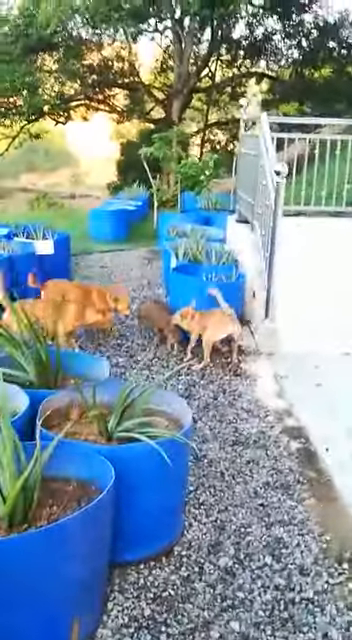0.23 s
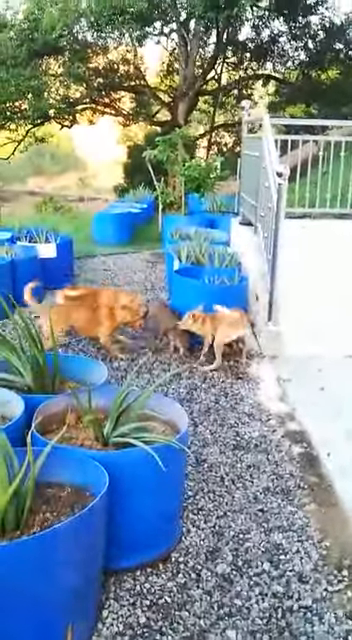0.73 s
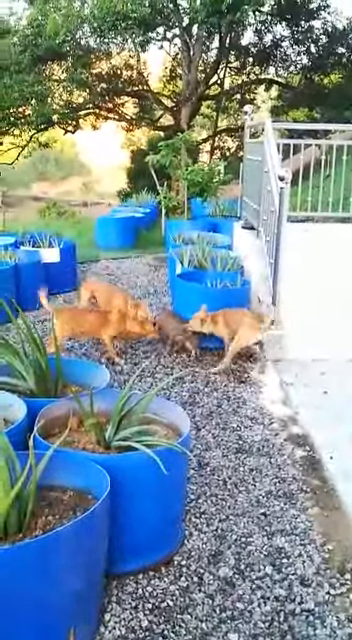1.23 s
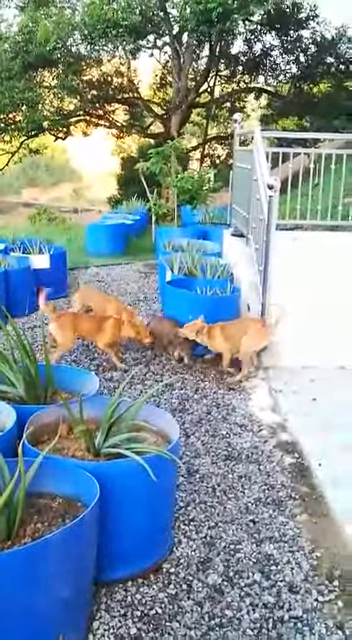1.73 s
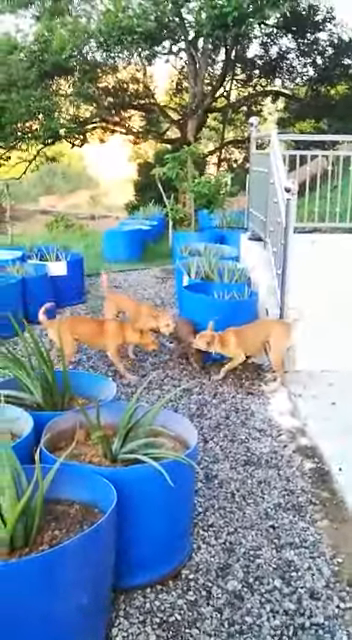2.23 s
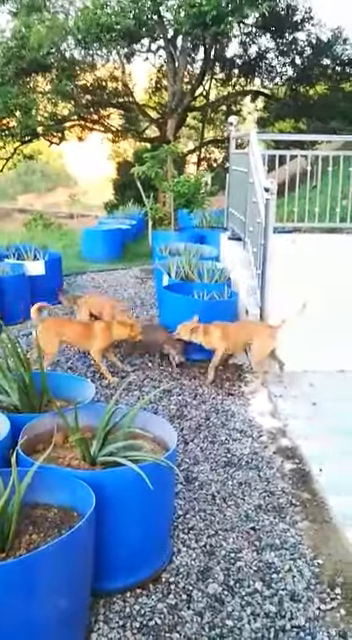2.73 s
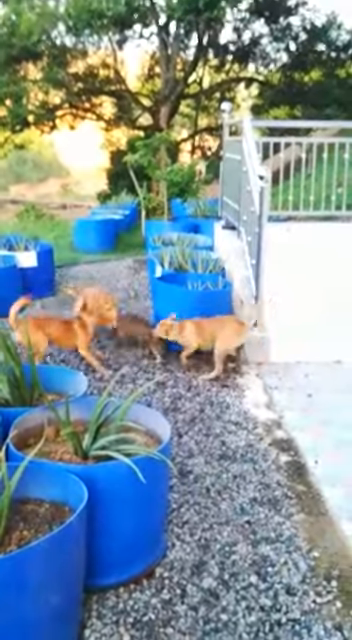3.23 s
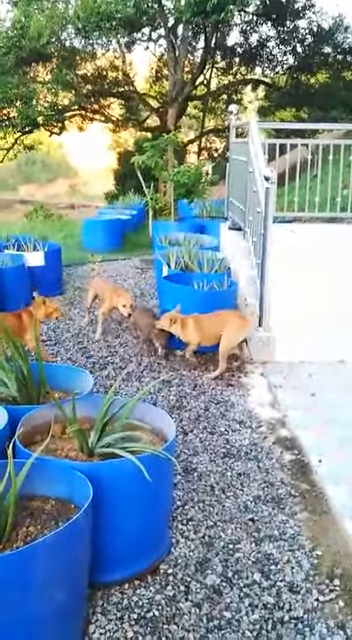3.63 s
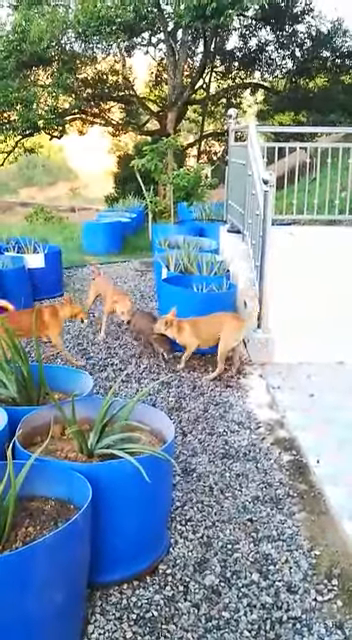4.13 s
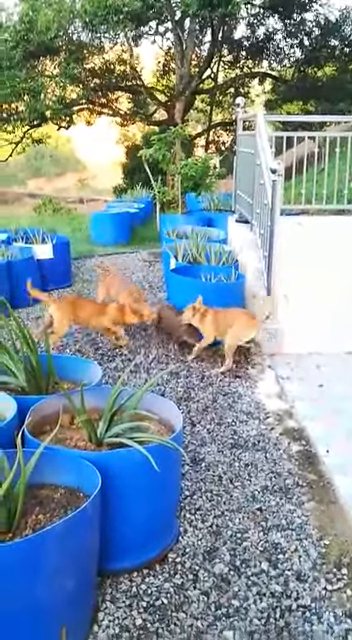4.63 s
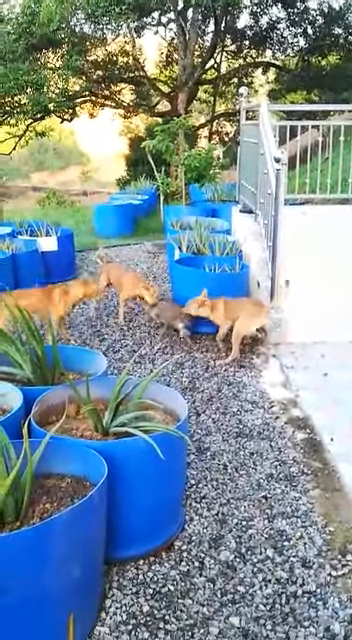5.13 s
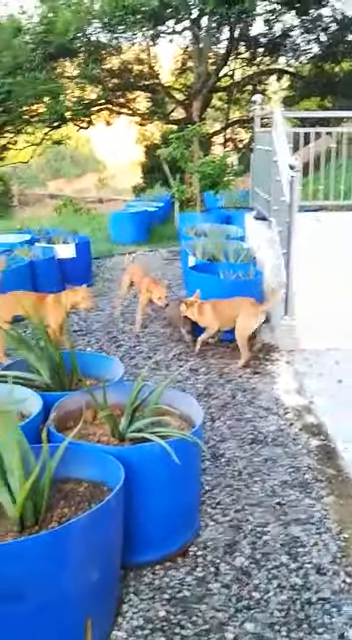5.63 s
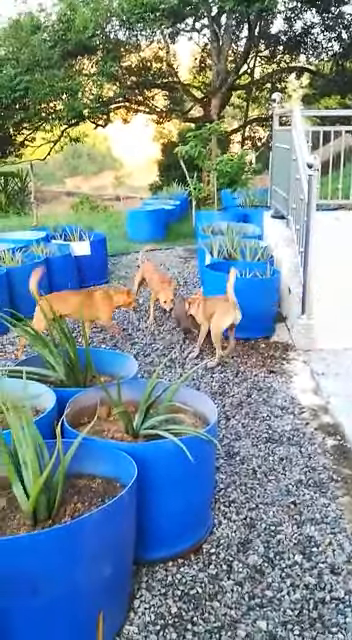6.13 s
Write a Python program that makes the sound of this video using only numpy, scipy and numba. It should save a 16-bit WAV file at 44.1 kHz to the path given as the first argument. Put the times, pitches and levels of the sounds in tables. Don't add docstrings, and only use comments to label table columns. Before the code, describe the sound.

The sound begins inside a young boar's hoarse scream, which pinches shut at 0.27 s with a tiny squeak. In the gap a dog snarls low and rough around 0.45 s while paws scrape gravel. A rising squeak leads into a long, loud, rasping scream from 0.6 to 2.7 s, wavering between torn noise and clearer tone, surging near 1.25 and 1.65 s. A brief gap holds a sudden growl and two hard gravel steps near 2.8 s. The longest scream bursts in tightly at 3.0 and lasts to 5.5 s, crossed by sharp dog yelps at 3.4 and 4.7 s, a low phone thump, and a short growl at 4.8 s. Light steps, a faint tap and a weak indrawn whistle fill the gap before another scream starts at 5.8 s, swells near 6.1 and continues to the end. Gravel crackles throughout, with short outdoor echoes and faint hush.

```python
import sys
import numpy as np
from scipy import signal
from scipy.fft import rfft, irfft, next_fast_len
from scipy.io import wavfile
from scipy.ndimage import uniform_filter1d
from numba import njit

SR = 44100
rng = np.random.default_rng(int(sys.argv[2]) if len(sys.argv) > 2 else 0)


def dump(signal):
    limited = np.clip(np.atleast_2d(signal).T, -1, 1)
    pcm = np.round(limited * 32767).astype(np.int16)
    wavfile.write(sys.argv[1], SR, pcm)


def undo_db(level):
    steps = np.asarray(level, float) / 20
    return 10 ** steps


N = 281799
T = np.arange(N) / SR

# f/Hz, density/dB
YARD_SPECTRUM = [(20, -4), (100, -13.5), (300, -10.5), (700, -7.5), (1100, -4), (2000, -7.5), (3500, -14.5),
                 (6500, -5), (11000, -38), (16000, -8.5)]
YARD_DB = -43.5
# f/Hz, level/dB
SCATTER = [(300, -13), (1000, 3), (2800, -3), (4500, -2), (7000, 20.5), (15000, -14)]
NEAR_T60_S, FAR_T60_S, FAR_DB, POSES = .05, .62, -14, 18
# f/Hz, level/dB
LEFT_OVER_RIGHT = [(200, 0), (750, 1), (1050, -1), (1900, 4), (2500, -1), (5000, -5), (6500, -16.5),
                   (8500, -10), (10000, -9.5), (14500, -6.5)]
LEFT_LAG_S, CUTOFF_HZ = 4.5e-5, 15860

# start t/s, end t/s, level/dB
SCUFFS = [
    (0.394, 0.605, -46),
    (2.776, 2.86, -39.5),
    (2.876, 2.96, -42.5),
    (5.502, 5.55, -44.5),
    (5.649, 5.75, -50.5),
]
GRAVEL_DB, GRAVEL_FOLLOWS, GRAVEL_REST_DB = -35.5, .57, -57.5
# t/s, peak level/dB, push f/Hz, rattle level/dB
KNOCKS = [
    (4.713, -36, 76, -30),
    (5.622, -44, 257, 18),
]

# t/s, f/Hz, level/dB
WHISTLES = [
    [(.245, 2400, -40), (.272, 1500, -29), (.29, 1380, -40)],
    [(.557, 1880, -41), (.58, 2120, -36), (.607, 2200, -29)],
    [(3.36, 540, -40), (3.4, 560, -27), (3.445, 565, -40)],
    [(5.64, 1680, -56), (5.71, 2040, -51), (5.79, 1650, -54)],
]
WHISTLE_OVERTONE_DB = [-13, -8]
# t/s, pitch f/Hz, level/dB
YELPS = [
    [(3.355, 555, -40), (3.387, 600, -26), (3.402, 780, -21), (3.428, 930, -22), (3.46, 1065, -15),
     (3.482, 1075, -23), (3.495, 760, -24), (3.512, 640, -26), (3.55, 605, -39)],
    [(4.655, 420, -30), (4.678, 515, -17), (4.697, 720, -18), (4.716, 930, -11), (4.731, 1015, -9),
     (4.755, 1070, -21), (4.778, 720, -21), (4.8, 620, -23), (4.845, 615, -32)],
]
# f/Hz, level/dB
YELP_THROAT = [(400, -20), (620, 0), (880, -3), (1060, -14), (1400, -8), (2050, 1), (3100, -7), (4200, -32)]
YELP_JAW_DB, YELP_JAW_S = 16, .03
# peak t/s, pitch f/Hz, peak level/dB, swell/s, fade/s
GROWLS = [
    (.45, 187.2, -36.5, 0.066, 0.2),
    (1.172, 190, -49, 0.084, .1),
    (1.67, 190, -47, .08, 0.066),
    (2.77, 207.6, -39, 0.031, .14),
    (3.352, 179, -43, 0.066, .06),
    (4.822, 200, -40.5, .04, 0.068),
]
# f/Hz, width/Hz, level/dB
GROWL_THROAT = [(190, 120, -8.5), (120, 16, 0), (620, 190, -9), (1100, 780, -16)]
GROWL_SAG_PER_S, GROWL_REST_DB, JAWS_SHUT_DB = 2.2, -67.5, -14
# start t/s, end t/s
SNARL = [(.43, .53)]

# start t/s, end t/s, mouth tightness at start [0-1], throat shutting at end [0-1]
BREATHS = [
    (-.1, .272, 0, 1),
    (.597, 2.722, 0, .6),
    (2.998, 5.468, 1, .7),
    (5.793, 6.7, .9, 0),
]
ATTACK_S, LOOSE_ATTACK_S, RELEASE_S = .005, .03, .025
# t/s, effort level/dB, snout facing level/dB
EFFORT = [
    [(0, -26.5, -1), (.2, -32.5, 5), (.29, -28.5, 4)],
    [(.6, -25, 5), (.66, -27.5, -1), (1.0, -23, 0), (1.5, -26, 1.5), (1.66, -24, -2), (1.74, -30, 0.5),
     (2.3, -25, -7), (2.51, -37, 4), (2.68, -28, 1.5)],
    [(3.0, -32, -1), (3.18, -26, -2.5), (3.3, -27.5, -6.5), (3.62, -28.5, -2), (4.46, -31.5, 1),
     (4.65, -27, -2), (4.87, -28.5, -5), (5.21, -29, 3), (5.45, -36, 3.5)],
    [(5.8, -44.5, 3), (5.88, -32.5, 3), (6.1, -24, -12), (6.22, -27, -12.5), (6.39, -26, -5)],
]
MEAN_EFFORT_DB = -28
# t/s, half length/s, level/dB
JOLTS = [
    (1.25, 0.079, 6.5),
    (1.646, 0.031, 4.5),
    (2.32, 0.11, 3),
    (6.2, 0.043, 3.5),
]
# start t/s, end t/s, roughness [0-1]
LOCKS = [(.62, .67, .5), (.72, 1.35, .92), (1.6, 1.7, 1), (1.75, 1.86, .04), (2.4, 2.55, 1),
         (2.635, 2.685, .22), (2.72, 3.54, .93), (3.56, 3.61, .45), (3.7, 4.92, .72), (4.95, 5.14, .4),
         (5.07, 5.13, .22), (5.17, 5.38, .45), (5.8, 6.5, 1)]
CHAOS, LOCK_EDGE_S = .8, .015
# t/s, f/Hz
OCTAVE = [(0, 781.5), (.2, 760.3), (.65, 787.8), (1.4, 857.1), (1.75, 800.3), (1.86, 780), (2.2, 811.8),
          (2.35, 873), (2.63, 776), (2.7, 754.8), (3.7, 773.6), (4.43, 800.4), (4.93, 776.6), (5.38, 731)]
OCTAVE_DB, OCTAVE_FOLLOWS = -45, 1

# t/s, third resonance f/Hz, snout resonance f/Hz, squeeze on the third level/dB
MOUTH = [
    [(0, 2820, 6740, -4.5), (.25, 2680, 6630, 3)],
    [(.6, 2920, 6340, -4.5), (.67, 3030, 6500, 0.5), (1.1, 2975, 6810, 0), (1.22, 2840, 6400, -1.5),
     (1.5, 2730, 6790, 2), (1.95, 2647, 6310, 2), (2.3, 2825, 6740, 0), (2.5, 2385, 5800, 6),
     (2.66, 3035, 6140, 0)],
    [(3.06, 2650, 6013, -5), (3.2, 2870, 6525, 1), (3.35, 2890, 5993, -10), (3.62, 2950, 6222, 4.5),
     (3.78, 2650, 6270, 14), (4.35, 2703, 6586, 5.5), (4.62, 2608, 6630, 3.5), (4.95, 2640, 6320, -3.5),
     (5.25, 2735, 6600, 4)],
    [(5.8, 2500, 6500, 6), (5.87, 2320, 6500, 9), (5.94, 2800, 6800, 8), (5.98, 2650, 7000, -6),
     (6.13, 2500, 7000, -5), (6.24, 2740, 6500, 5), (6.39, 2600, 6100, 1)],
]
REST_HZ = [1279, 2036, 3495, 4476]
FOLLOWS_MOUTH = [0.12, 0.49, 0.57, -0.0073]
# width/Hz, level/dB
MOVING = [(190, 21.5), (238, 0), (126, 3), (384, -2.5), (443, -7.5), (583, 9.5)]
# region [0-3], f/Hz, width/Hz, level/dB
STAYING = [(0, 762, 178, -3), (0, 440, 55.6, -72), (3, 5545, 300, 3.5), (3, 7260, 735, 2.5),
           (3, 9160, 1100, -8.5), (3, 9900, 2480, -52), (3, 15100, 1160, -8)]
WANDER = .03
# f/Hz, width/Hz, depth [0-1]
SINUS_DIPS = [
    (2290, 200, .95),
    (5150, 300, .6),
]
OPEN_DIP_S, SNOUT_LATE_S, SNOUT_SHUT_DB = .14, .04, -14
SQUEEZE_LIFT, SQUEEZE_DIMS = .68, .5

REGION_DB = [-11, -9, 1.5, 1]
REGION_FOLLOWS = [0.99, 0.21, 1.06, 1.2]
JOLT_SHARE = [1.24, 1.54, 0.22, 0.14]
LOCK_DB = [-6, 2, 2.9, 1]
OPEN_DB = [1, 3, -3, -4]
OPEN_RISE = [.15, -.03, .36, .12, .02, -.03]
CLOSE_DB = [6, 6, -12, -18]
CLOSE_RISE = [.09, -.06, -.15, -.01, .04, -.04]
OPEN_S, CLOSE_S = .045, .045


def rms_one(x):
    return x / np.sqrt(np.mean(x ** 2) + 1e-20)


def in_time(rows):
    s, *columns = np.transpose(rows)
    return [np.interp(T, s, c) for c in columns]


def gate(spans, fade_s):
    return np.max([np.clip(np.minimum(T - a, b - T) / fade_s + 1, 0, 1) for a, b in spans], axis=0)


def at_hz(points, hz):
    f, db = np.transpose(points)
    return np.interp(np.log(hz + 1), np.log(f), db)


def drift(rate_hz):
    r = np.exp(-2 * np.pi * rate_hz / SR)
    return rms_one(signal.lfilter([1], [1, -2 * r, r * r], rng.standard_normal(N + SR))[SR:])


@njit
def sweep(x, a1, r2):
    y = np.zeros(len(x))
    for i in range(2, len(x)):
        y[i] = (1 - r2) / 2 * (x[i] - x[i - 2]) + a1[i] * y[i - 1] - r2 * y[i - 2]
    return y


def resonate(x, hz, width_hz):
    r = np.exp(-np.pi * width_hz / SR)
    return sweep(x, 2 * r * np.cos(2 * np.pi * hz / SR) * np.ones(N), r * r)


def evened(x, span_s):
    return x / np.sqrt(uniform_filter1d(x ** 2, int(span_s * SR)) + 1e-12)


def yard():
    hz = np.fft.rfftfreq(N, 1 / SR)
    mid, side = rfft(rng.standard_normal((2, N))) * undo_db(at_hz(YARD_SPECTRUM, hz))
    apart = np.clip(.3 + np.abs(np.log2((hz + 1) / 140)) * .6, 0, 1)
    hush = irfft(mid + apart * side * [[1], [-1]], N)
    return undo_db(YARD_DB + 2.0 * drift(6.3)) * rms_one(hush)


def echoes(t60_s, start_s, size):
    age = np.arange(SR) / SR
    pattern = rng.standard_normal((2, SR)) * undo_db(-60 * age / t60_s) * (age > start_s)
    return rfft(pattern / np.sqrt(np.sum(pattern ** 2, axis=1, keepdims=True)), size)


def outdoors(x):
    size = next_fast_len(N + SR)
    hz = np.fft.rfftfreq(size, 1 / SR)
    share = undo_db(at_hz(SCATTER, hz))
    pose = T / T[-1] * (POSES - 1)
    near = 0
    for k in range(POSES):
        posed = x * np.cos(np.pi / 2 * np.clip(pose - k, -1, 1))
        near = near + rfft(posed, size) * echoes(NEAR_T60_S, .002, size)
    direct = np.exp(-2j * np.pi * hz * LEFT_LAG_S * np.array([[1], [0]]))
    far = undo_db(FAR_DB) * echoes(FAR_T60_S, .043, size)
    heard = rfft(x, size) * (direct + far) + share * near
    return irfft(heard / np.sqrt(1 + share ** 2 / 2), size)[:, :N]


def effort():
    db, facing_db = in_time(sum(EFFORT, []))
    return db - MEAN_EFFORT_DB, facing_db


def blowing():
    total = np.zeros(N)
    for a, b, tight, _ in BREATHS:
        attack_s = ATTACK_S + LOOSE_ATTACK_S * (1 - tight)
        total += np.clip(np.minimum((T - a) / attack_s, (b - T) / RELEASE_S + 1), 0, 1)
    return total


def gravel():
    sizes = undo_db(.6 * np.minimum(rng.exponential(1, (2, N)), 5)) * rng.choice([-1, 1], (2, N))
    rate_hz = 5000 * undo_db(3.0 * drift(9))
    clicks = sizes * (rng.random((2, N)) < rate_hz / SR)
    stones = signal.sosfilt(signal.butter(2, [4200, 11000], "band", fs=SR, output="sos"), clicks)
    strain_db, _ = effort()
    struggle = undo_db(GRAVEL_DB + GRAVEL_FOLLOWS * strain_db) * blowing()
    scuffs = sum(undo_db(db) * gate([(a, b)], .054) for a, b, db in SCUFFS)
    return (struggle + np.maximum(scuffs, undo_db(GRAVEL_REST_DB))) * rms_one(stones)


def knocks():
    out = np.zeros(N)
    for s, db, hz, rattle_db in KNOCKS:
        age = np.maximum(T - s, 0)
        rattle = signal.lfilter([.3], [1, -.75], rng.standard_normal(N)) * (T > s)
        push = np.sin(2 * np.pi * hz * age)
        out += undo_db(db) * (push + undo_db(rattle_db) * rattle) * np.exp(-age / .0055)
    return out * undo_db([[2.5], [-2.5]])


def tones(tables, wobble, flutter_db, rasp):
    pitch_hz, *partial_db = in_time(sum(tables, []))
    phase = 2 * np.pi * np.cumsum(pitch_hz * (1 + wobble * drift(64.5))) / SR
    voiced = np.zeros(N)
    for k, db in enumerate(partial_db, 1):
        voiced += np.sqrt(2) * undo_db(db + flutter_db * drift(58.0)) * np.sin(k * phase)
    voiced *= (1 + rasp * drift(340)) * gate([(t[0][0], t[-1][0]) for t in tables], .008)
    return signal.sosfilt(signal.butter(6, 470, "high", fs=SR, output="sos"), voiced)


def whistles():
    tables = [[(s, hz, db, *np.add(db, WHISTLE_OVERTONE_DB)) for s, hz, db in rows] for rows in WHISTLES]
    return tones(tables, wobble=.014, flutter_db=3, rasp=.25)


def yelps():
    tables = []
    for rows in YELPS:
        top_s = max(rows, key=lambda row: row[1])[0]
        table = []
        for s, hz, db in rows:
            shut_db = YELP_JAW_DB * np.clip((s - top_s) / YELP_JAW_S, 0, 1)
            partials = [db + at_hz(YELP_THROAT, k * hz) - shut_db * (k - 1) for k in range(1, 5)]
            table.append((s, hz, *partials))
        tables.append(table)
    return tones(tables, wobble=.012, flutter_db=2.0, rasp=.4)


def folds(pitch_hz, rough, jitter, shimmer_db, hiss, count):
    shake = jitter * rough ** 2 * drift(130.46) + .006 * drift(17.91)
    phase = 2 * np.pi * np.cumsum(pitch_hz * (1 + shake)) / SR
    pulses = sum(np.cos(k * phase) for k in range(1, count + 1)) / np.sqrt(count / 2)
    air = hiss * rough * (1 + np.cos(phase)) * rng.standard_normal(N)
    return pulses * undo_db(shimmer_db * rough * drift(360)) + air


def growl():
    shapes, pitches = [], []
    for s, hz, db, swell_s, fade_s in GROWLS:
        shapes.append(undo_db(db) * np.exp(-3 * np.where(T < s, (s - T) / swell_s, (T - s) / fade_s)))
        pitches.append(hz * np.clip(1 - GROWL_SAG_PER_S * (T - s), .6, 1.2))
    loudest = np.argmax(shapes, axis=0)
    pitch_hz = uniform_filter1d(np.array(pitches)[loudest, np.arange(N)], size=441)
    source = folds(pitch_hz, .8, jitter=.25, shimmer_db=4.0, hiss=.5, count=8)
    shut_db = JAWS_SHUT_DB * (1 - gate(SNARL, .03))
    throat = np.zeros(N)
    for hz, width_hz, db in GROWL_THROAT:
        throat += undo_db(db + (hz > 300) * shut_db) * resonate(source, hz * pitch_hz / 185, width_hz)
    return (np.sum(shapes, axis=0) + undo_db(GROWL_REST_DB)) * evened(throat, .15)


def throat_regions(source, rough, opening, closing, third_hz, snout_hz, squeeze_db):
    near = []
    for hz, follows in zip(REST_HZ, FOLLOWS_MOUTH):
        near.append(hz * (third_hz / 2760) ** follows * (1 + WANDER * drift(4.2)))
    centres = near[:2] + [third_hz] + near[2:] + [snout_hz]
    places = []
    for region, hz, up, down, shape in zip([0, 1, 2, 2, 2, 3], centres, OPEN_RISE, CLOSE_RISE, MOVING):
        places.append((region, hz * (1 + up * opening + down * closing), *shape))
    regions = np.zeros((4, N))
    for k, (region, hz, width_hz, db) in enumerate(places + list(STAYING)):
        hz = hz * (1 + .012 * drift(12) + (region == 3) * .018 * drift(2.5))
        db = db + 2.5 * drift(18) * rough
        db = db + (squeeze_db if k == 2 else 3.5 * drift(5))
        if k in (6, 7):
            db = db + 50 * np.maximum(rough - .85, 0)
        rung = resonate(resonate(source, hz, 2.8 * width_hz), hz, width_hz)
        regions[int(round(region))] += (-1) ** k * undo_db(db) * rung
    return regions


def boar():
    octave_hz, = in_time(OCTAVE)
    rough = CHAOS
    for start, end, value in LOCKS:
        rough = rough + (value - rough) * gate([(start, end)], LOCK_EDGE_S)
    source = folds(octave_hz / 2, rough, jitter=.13, shimmer_db=3.2, hiss=.8, count=36)

    opening, closing = np.zeros(N), np.zeros(N)
    for a, b, tight, hard in BREATHS:
        opening += tight * np.exp(-np.maximum(T - a, 0) / OPEN_S) * (T > a - .1)
        closing += hard * np.clip(1 - (b - T) / CLOSE_S, 0, 1.3) * (T < b + .1)
    third_hz, snout_hz, squeeze_db = in_time(sum(MOUTH, []))
    regions = throat_regions(source, rough, opening, closing, third_hz, snout_hz, squeeze_db)

    strain_db, facing_db = effort()
    jolt_db = sum(db * np.exp(-((T - s) / half_s) ** 2) for s, half_s, db in JOLTS)
    snout_shut = gate([(a - .1, a + SNOUT_LATE_S * tight - .01) for a, b, tight, _ in BREATHS[2:]], .012)
    own_db = [0, -SQUEEZE_DIMS * np.maximum(squeeze_db, 0), SQUEEZE_LIFT * squeeze_db,
              facing_db + SNOUT_SHUT_DB * snout_shut]
    voice = np.zeros(N)
    for k in range(4):
        db = REGION_DB[k] + MEAN_EFFORT_DB + REGION_FOLLOWS[k] * strain_db + own_db[k]
        db = db + JOLT_SHARE[k] * jolt_db + OPEN_DB[k] * opening + CLOSE_DB[k] * closing
        db = db + LOCK_DB[k] * (1 - rough / CHAOS)
        voice += undo_db(db) * evened(regions[k], .024)

    early = gate([(a, a + OPEN_DIP_S * tight) for a, b, tight, _ in BREATHS], .017)
    for (hz, width_hz, depth), when in zip(SINUS_DIPS, [early, 1]):
        voice = voice - np.clip(depth, 0, 1) * when * resonate(voice, hz, width_hz)
    octave_db = OCTAVE_DB + OCTAVE_FOLLOWS * strain_db - 90 * np.maximum(rough - .8, 0) - 15 * closing
    octave = resonate(resonate(source, octave_hz, 180), octave_hz, 43)
    return blowing() * (voice + undo_db(octave_db) * evened(octave, .01))


def scene():
    animals = whistles() + yelps() + growl() + boar()
    return yard() + gravel() + knocks() + outdoors(animals)


def top_cut(x):
    return signal.sosfilt(signal.butter(12, 16510, fs=SR, output="sos"), x)


def record(dry):
    hz = np.fft.rfftfreq(N, 1 / SR)
    tilt = undo_db(at_hz(LEFT_OVER_RIGHT, hz))
    colour = np.array([tilt, np.ones_like(tilt)]) * 2 / (1 + tilt)
    ports = irfft(rfft(dry) * colour * (hz < CUTOFF_HZ), N)
    return top_cut(.95 * np.tanh(ports / .95))


dry = scene()
out = record(dry)
dump(out)
```